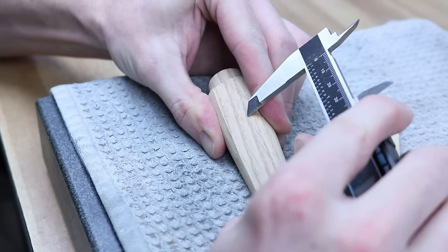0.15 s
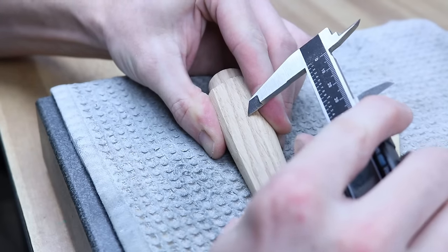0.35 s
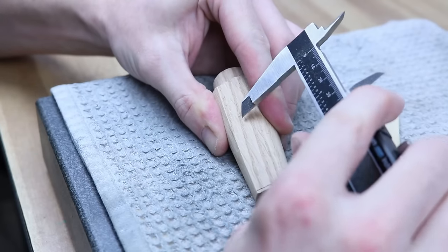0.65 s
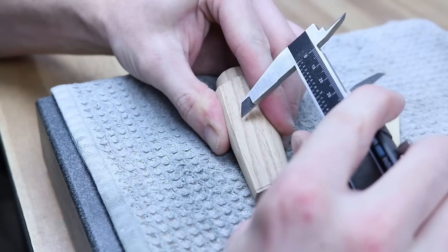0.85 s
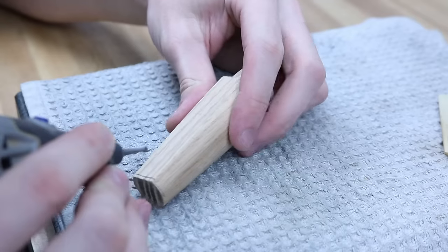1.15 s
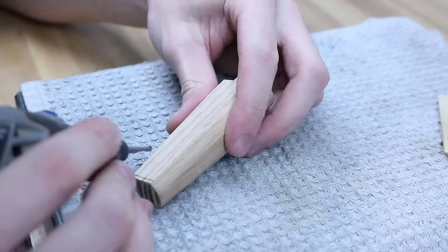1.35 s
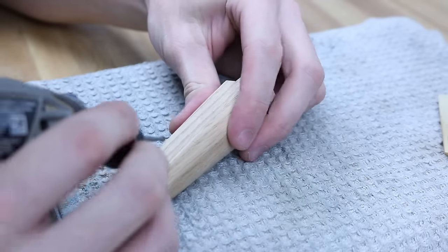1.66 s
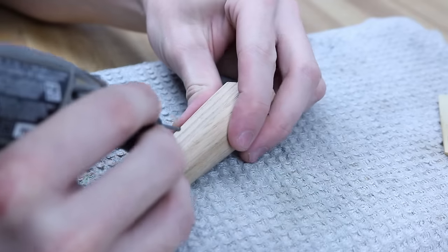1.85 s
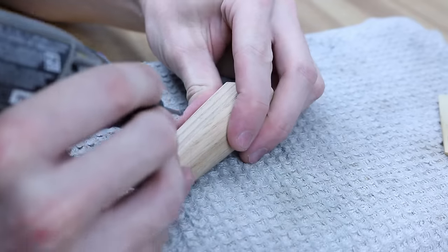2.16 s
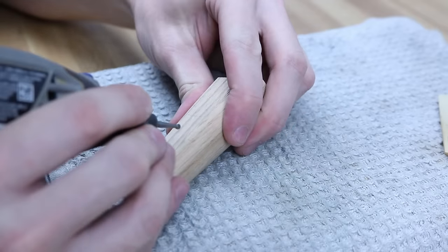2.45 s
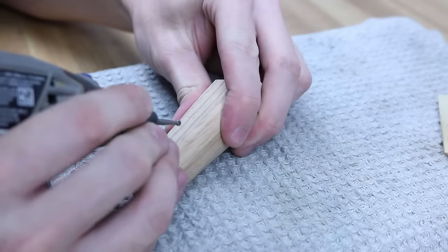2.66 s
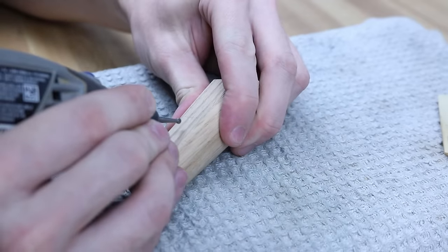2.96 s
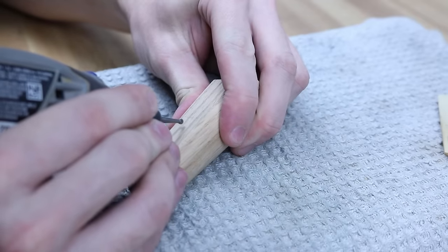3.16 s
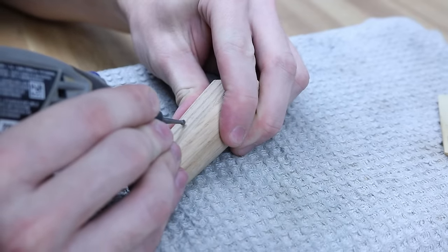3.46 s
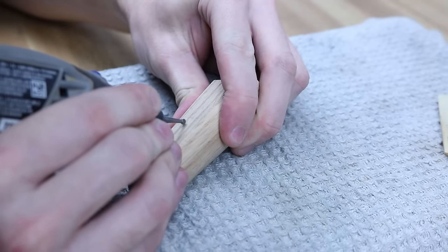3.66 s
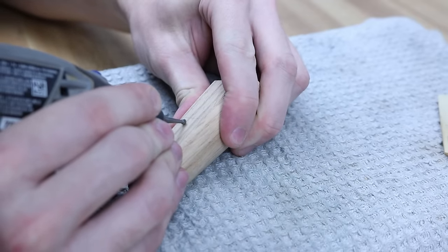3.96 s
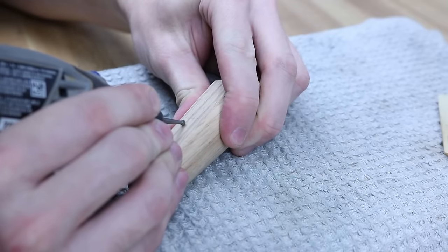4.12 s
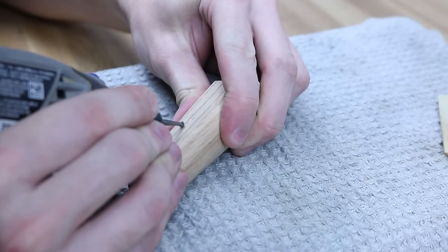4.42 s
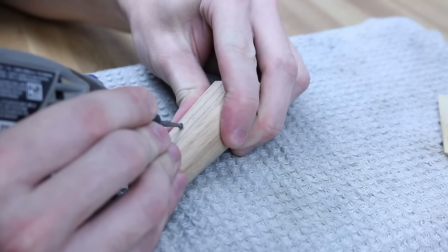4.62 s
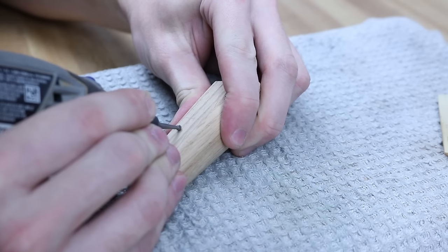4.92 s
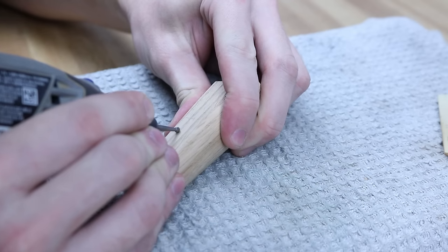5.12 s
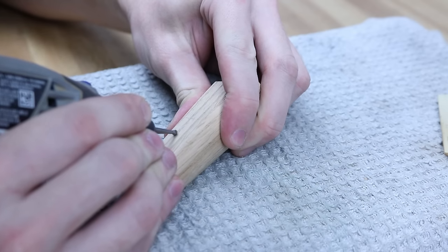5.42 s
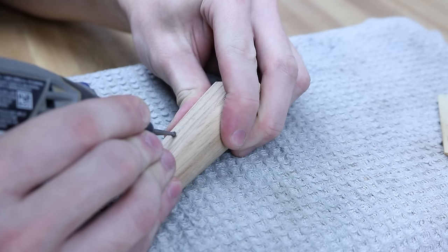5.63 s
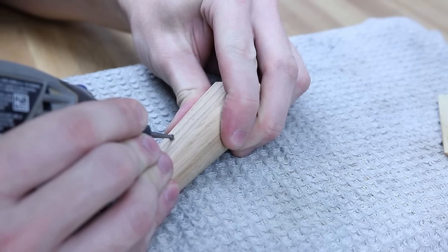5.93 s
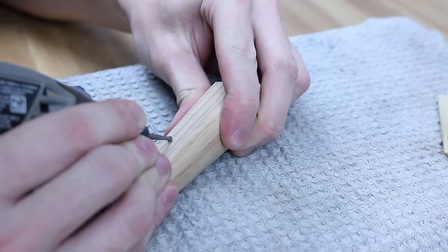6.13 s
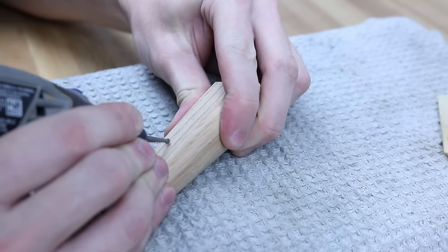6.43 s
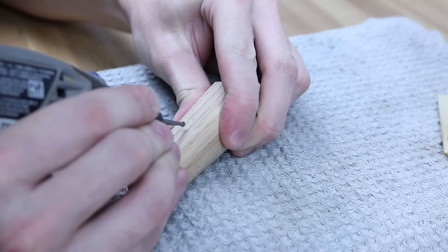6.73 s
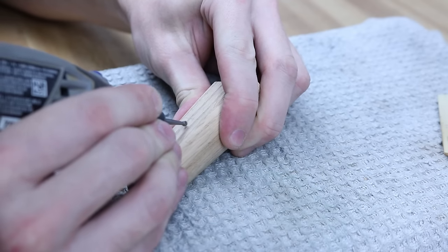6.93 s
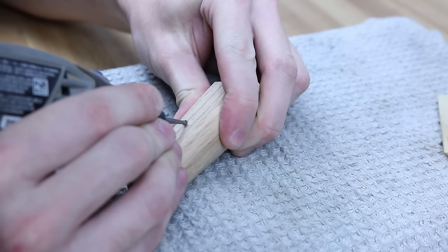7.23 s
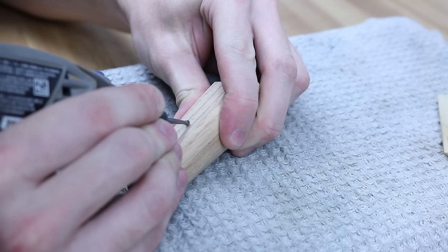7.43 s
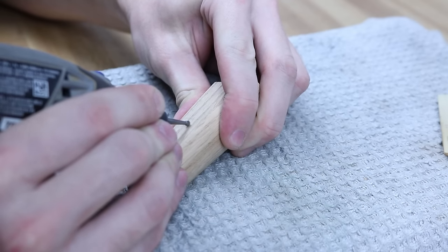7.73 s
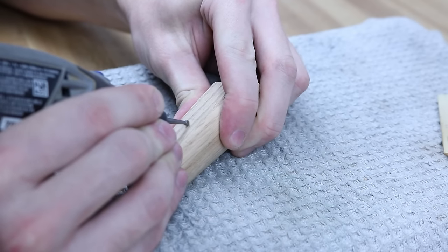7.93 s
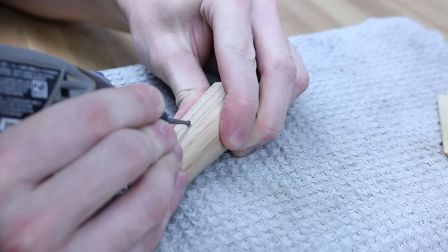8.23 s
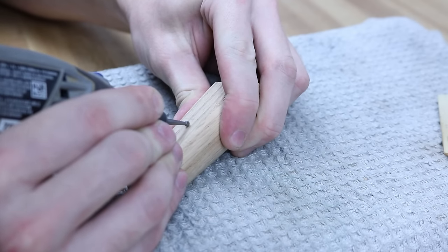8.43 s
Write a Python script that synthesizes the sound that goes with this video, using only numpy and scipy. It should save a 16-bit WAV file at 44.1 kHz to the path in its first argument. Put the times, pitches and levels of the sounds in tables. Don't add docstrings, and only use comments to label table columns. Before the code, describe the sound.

From 0 to 1.1 s a quiet workshop: soft low room hush, a faint wavering mid-low drone from a distant appliance, a small tick of calipers on wood right at the start and a fainter one just before the change. At 1.1 s it cuts abruptly to a small rotary tool already running very close: a piercing, many-toned electric whine over bright rushing air, its timbre shifting as hands move around it, with soft low air buffets mainly at right. Around 3.8 s the bit touches wood; from 4.2 s a rough buzzing grind grows and the pitch slowly sags, lowest near 6.4 s. The bit lifts at 6.5 s, the grinding drops away and the whine climbs back. From 7.1 s a second pass grinds in short uneven pushes, strong until the sound stops mid-cut at 8.6 s. Dry, close stereo.

```python
import sys
import numpy as np
from scipy import signal
from scipy.fft import rfft, irfft
from scipy.io import wavfile
from scipy.ndimage import uniform_filter1d

SR = 44100
rng = np.random.default_rng(int(sys.argv[2]) if len(sys.argv) > 2 else 0)


def volts(x):
    e = np.asarray(x, float) / 20
    return 10 ** e


def digitize_waveform(pressure):
    field = np.atleast_2d(pressure).T
    bounded = np.clip(field, -1, 1)
    quanta = np.round(bounded * 32767).astype(np.int16)
    wavfile.write(sys.argv[1], SR, quanta)


N = 378378
T = np.arange(N) / SR
HOP = 256
START_S = 1.0902
MAINS_HZ, HUM_DB = 119.8, -74.5

# time_s, shaft_hz
SPEED = [(1.1, 245.57), (1.45, 245.56), (1.93, 245.92), (2.5, 246.56), (3.15, 246.39), (3.75, 246.47),
         (4.14, 246.06), (4.65, 244.73), (5.33, 241.4), (6.01, 235.79), (6.38, 233.95), (6.46, 234.2),
         (6.7, 238.5), (6.9, 240.75), (7.15, 242.85), (7.47, 243.84), (8.32, 243.47), (8.58, 242.2)]
FREE_HZ = 246.6


def motor():
    shaft_hz, = columns(SPEED)
    return shaft_hz, np.maximum(FREE_HZ - shaft_hz, 0)


# shaft_multiple, left_db, right_db
BARS = [(7, -90, -90), (8, -64, -58), (9, -63, -66), (15, -62, -64), (16, -42, -45), (17, -55, -62),
        (23, -63, -65), (24, -52, -56), (25, -52, -56), (31, -63, -64), (32, -43, -53), (33, -53, -57),
        (39, -59, -63), (40, -52, -64), (41, -53, -60), (47, -62, -71), (48, -53, -68), (49, -58, -68),
        (55, -63, -67), (56, -53, -61), (57, -58, -72)]
# shaft_multiple, left_db, right_db
SHAFT = [(18, -44, -47), (19, -65, -72), (21, -60, -68), (26, -64, -66), (27, -55, -55), (29, -58, -60),
         (30, -63, -73), (34, -63, -68), (35, -56, -62), (36, -53, -66), (37, -56, -69), (38, -60, -67),
         (42, -55, -72), (43, -65, -70), (45, -62, -70), (53, -65, -73), (54, -64, -67), (59, -63, -74)]
# shaft_multiple, left_db, right_db
BEARING = [(16.3, -58, -62), (15.3, -66, -68), (1, -82, -77)]
# shaft_multiple, level_db
SPARK = [(19, -68), (50, -70), (68, -74)]
# time_s, second_bar_tone_db, fourth_bar_tone_db, blade_tone_db
SHADE = [(1.1, -46, -48, -46.5), (1.3, -44, -48, -47.5), (1.62, -42.5, -40, -47.5),
         (2.0, -55.5, -47.5, -44.7), (2.27, -54, -50, -46), (2.5, -44.5, -40.5, -48),
         (2.95, -41, -43, -43.5), (3.3, -39, -44, -44), (4.14, -39.5, -46.5, -42.5),
         (4.31, -47, -45.5, -43), (4.82, -46, -47.5, -42.5), (5.0, -37.5, -44.5, -43.5),
         (5.4, -48.5, -54, -43.5), (6.01, -48.5, -54, -44), (6.38, -54, -55, -54), (6.62, -45.5, -48, -43),
         (7.1, -42.5, -44.5, -44.5), (8.58, -48.5, -44.5, -43.5)]
# time_s, left_lead_rad
TURN = [(1.9, .1), (2.3, 2.1), (5, 1.9), (6.5, 1.1)]
# frequency_hz, left_lead_rad
LEAD = [(300, 0), (2000, 1.1), (3200, 2), (4400, 1.3), (5900, 3.1), (7900, 4.2), (10000, 5.5), (13800, 5.6)]
# frequency_hz, gain_db
GRIPPED = [(2000, 1), (6000, -8.5), (7300, 2.5), (8100, -7), (9100, 5), (10100, -13.5), (11000, -0.5),
           (13700, -5)]
GRIP_S, SPARK_LOAD_DB = 4.25, 5
SAG_DB_PER_HZ = -0.05
SPEED_UP_DB = 0.1347


def tones(turns, shaft_hz, sag_hz, waver=0.36, steady=0.11):
    second_db, fourth_db, blade_db = columns(SHADE)
    own = {16: second_db, 32: fourth_db, 18: blade_db}
    recovery = uniform_filter1d(np.gradient(shaft_hz) * SR, size=4000)
    other_db = SAG_DB_PER_HZ * sag_hz + SPEED_UP_DB * np.maximum(recovery, 0)
    other_db = other_db - np.mean(other_db[SR:4 * SR])
    mean_hz = np.mean(np.diff(turns)) * SR
    surge = np.cos(2 * np.pi * MAINS_HZ * T)
    rows = BARS + SHAFT + BEARING
    free = sorted(set(range(19, 69)) - {round(row[0], 1) for row in rows})
    spark_db = np.interp(free, *np.transpose(SPARK))
    sparks = [(k, db, db - 11.0) for k, db in zip(free, spark_db)]
    skirt = signal.butter(1, 330, fs=SR, output="sos")
    grip = np.clip((T - GRIP_S) / 0.28 + 0.5, 0, 1)
    turned = np.interp(np.arange(N // HOP + 2) * HOP / SR, *np.transpose(TURN))
    out = np.zeros((2, N))
    for k, left_db, right_db in rows + sparks:
        k = round(k, 1)
        if k in own:
            level_db = own[k]
        else:
            grip_db = SPARK_LOAD_DB if k in free else read(GRIPPED, k * mean_hz)
            level_db = left_db + other_db + grip * grip_db
        level = volts(level_db) * np.sqrt(2)
        if k % 8 == 0:
            level = level * (1 + (0.9 if k == 8 else 0.16) * surge)
        if k == 8:
            level = level * volts(1.7 * (np.gradient(turns) * SR - 246.0))
        re, im, re_right, im_right = (steady if k in own else waver) * slow(1.35, count=4)
        spin = np.exp(2j * np.pi * (k * turns + rng.random()))
        if k in own:
            fuzz = evened(signal.sosfilt(skirt, rng.standard_normal((N, 2)) @ [1, 1j]))
            spin = spin * (1 + 0.21 * fuzz)
        lead = turned if k == 16 else read(LEAD, k * mean_hz)
        late = np.exp(-1j * lead) * volts(right_db - left_db)
        out[0] += level * (spin * full(1 + re + 1j * im)).real
        out[1] += level * (spin * full(late * (1 + re_right + 1j * im_right))).real
    return out


# frequency_hz, width_hz, level_db
BLOCK = [(243.5, 34, -20.5), (967, 53, -2.5), (1170, 59, -5), (1656, 190, -3)]
# frequency_hz, width_hz, level_db
BIT = [(2130, 190, -10), (2876, 470, -6), (3128, 150, -10.5), (4520, 350, -8), (5520, 1400, -1),
       (6530, 140, -11.5), (7900, 2000, -5.5)]
# frequency_hz, width_hz, level_db
GRIP = [(504.5, 300, -0.5)]
# time_s, level_db, left_minus_right_db
THUD = [
    (3.8, -70, 4),
    (4.25, -60, 7),
    (4.93, -59, 9),
    (5.59, -67.5, 18),
    (6.27, -66.5, -27),
    (6.69, -69.5, 9.5),
    (8.45, -54.5, 13),
    (8.58, -59, 9),
]


def cutting(turns, sag_hz, uneven=0.031, chips=0.44):
    block_db, bit_db, block_hz, bit_hz = effort(sag_hz)
    thud_db, thud_pan = columns(THUD)
    phase = 2 * np.pi * turns
    knock = evened(sum(np.cos(k * phase) for k in range(1, 45)))
    each_turn = rng.standard_normal(int(turns[-1]) + 2)
    knock = knock * (1 + uneven * each_turn[(turns + 0.5).astype(int)])
    knock = knock * volts(1.28 * full(slow(6.8)[0]))
    tear = evened(np.exp(-(turns % 1) / 0.28) * rng.standard_normal(N))
    low = volts(block_db - 1.83) * rung(knock + 0.032 * tear, BLOCK, block_hz, 620.0)
    high = volts(bit_db + 4.5) * rung(knock + chips * tear, BIT, bit_hz, 370.0)
    rocking = rung(knock, GRIP, np.full(N, 725.0), 220.0)
    thud = volts(thud_db - 1.5) * (T > THUD[0][0]) * rocking
    right = np.roll(low, 3) + volts(1.8) * np.roll(high, 3)
    return np.array([low + high, right]) + thud * volts([thud_pan / 2, -thud_pan / 2])


# time_s, knock_through_block_db, knock_through_bit_db
CUT = [(3.8, -83, -62), (4.1, -68, -56), (4.3, -58, -49), (4.9, -53, -46.5), (5.2, -48.5, -50),
       (5.9, -49.5, -51.5), (6.15, -46.5, -54), (6.42, -45, -56.5), (6.5, -69, -65), (7.03, -70, -67),
       (7.12, -57, -51.5), (7.48, -53, -50.5), (7.75, -50, -51.5), (8.1, -51, -52), (8.3, -49, -47.5),
       (8.47, -46, -50.5), (8.58, -49, -52)]
# time_s, extra_db, width_s
PUSHES = [(4.3, 2, 0.042), (4.52, 1, 0.062), (4.82, 1, .05), (4.99, -1, 0.061), (5.4, 2.5, 0.062),
          (5.8, 2.5, .05), (6.0, 3, .05), (7.34, -1, 0.024), (7.6, 8.5, 0.053), (7.68, -6, .02),
          (7.87, 5.5, 0.038), (8.14, 6, 0.036), (8.19, -9, 0.0079), (8.25, 5, 0.027), (8.42, 5, 0.045)]
BLOCK_RING_HZ, BLOCK_RISE = 980, 36
BIT_RING_HZ, BIT_FALL = 3954, 263
RING_WANDER = 0.015


def effort(sag_hz):
    push = sum(db * np.exp(-0.5 * ((T - s) / width) ** 2) for s, db, width in PUSHES)
    block_db, bit_db = columns(CUT)
    block, bit = (1 + RING_WANDER * full(drift) for drift in slow(4.0, count=2))
    block_hz = BLOCK_RING_HZ + BLOCK_RISE * sag_hz
    bit_hz = BIT_RING_HZ - BIT_FALL * np.sqrt(sag_hz)
    return block_db + push, bit_db + 0.76 * push, block * block_hz, bit * bit_hz


def rung(drive, modes, moving_hz, width_hz):
    turn = np.exp(2j * np.pi * np.cumsum(moving_hz) / SR)
    r = np.exp(-np.pi * width_hz / SR)
    twice = np.convolve([1, -r], [1, -r])
    out = evened((turn * signal.lfilter([1], twice, drive / turn)).real)
    for hz, wide, db in modes:
        b, a = signal.iirpeak(hz, hz / wide, SR)
        out = out + volts(db) * evened(signal.lfilter(b, a, signal.lfilter(b, a, drive)))
    return evened(out)


# frequency_hz, density_db_per_hz
AIR = [(150, -20), (400, -17), (500, -6.5), (700, -9.5), (1250, 2), (1900, -4), (3000, 2), (4450, -5.5),
       (4950, -9.5), (5700, 0), (7800, -3), (9000, -3), (10500, -5.5), (16000, -16.5)]
# frequency_hz, likeness
AIR_SAME = [(300, 0.91), (1300, 0.75), (2000, 0.99), (4000, 0.7), (12000, 0.033)]
# frequency_hz, left_minus_right_db
LEAN = [(200, 1), (2400, -1), (4400, 2), (8000, 8.5), (15000, 1)]


def air(turns, beat=0.023, level_db=-43.5):
    pulse = 1 + beat * np.cos(2 * np.pi * turns) + 0.082 * np.cos(4 * np.pi * turns)
    return volts(level_db) * pulse * noise(AIR, AIR_SAME, LEAD, LEAN)


def draught(spread=0.39, length_s=0.015):
    sos = signal.butter(2, [35, 130], "bandpass", fs=SR, output="sos")
    out = volts([[-84.0], [-74.0]]) * evened(signal.sosfilt(sos, rng.standard_normal((2, N))))
    t, f = np.arange(-2048, 2048) / SR, np.fft.rfftfreq(4096, 1 / SR)
    shape = np.exp(-0.5 * (t / length_s) ** 2)
    for s, db, hz in buffets():
        octave_width = np.where(f < hz, 1.1, spread)
        hump = np.exp(-0.5 * (np.log((f + 1) / hz) / octave_width) ** 2)
        hump = hump * np.clip(f / 50, 0, 1) ** 3
        eddies = irfft(rfft(rng.standard_normal(4096)) * hump)
        eddies = eddies / np.sqrt(np.sum((eddies * shape) ** 2) / np.sum(shape ** 2))
        gains = volts([[db - 19.0 + BUFFET_PAN_DB], [db - 6.0]])
        part = out[:, round(s * SR) - 2048:][:, :4096]
        part += (gains * shape * eddies)[:, :part.shape[1]]
    return out


# time_s, right_db, centre_hz
BUFFETS = [(1.316, -46, 101), (1.526, -46, 107), (1.732, -45.5, 144), (1.88, -48, 101), (1.959, -45, 101),
           (2.037, -38, 135), (2.566, -43, 110), (2.686, -49.5, 78), (3.06, -42, 191), (3.512, -49, 116),
           (3.564, -39.5, 135), (3.823, -46, 138), (3.897, -48.5, 94), (4.251, -49, 120), (4.286, -45, 104),
           (4.52, -46, 120), (4.583, -41, 156), (5.04, -47, 92), (5.282, -45, 114), (5.489, -39, 127),
           (5.852, -44.5, 119), (5.956, -41.5, 141), (6.013, -46, 102), (6.604, -47, 100),
           (6.984, -42, 125), (7.565, -46.5, 120), (7.905, -41.5, 104), (7.95, -47, 98),
           (8.336, -36.5, 144), (8.429, -45, 148)]
BUFFET_PAN_DB, FLUTTER_DB, FLUTTER_HZ = -28, -54, 110


def buffets(count=36):
    when, size, pitch = rng.random((count, 3)).T
    s = START_S + 0.1 + (np.arange(count) + when) / count * (N / SR - START_S - 0.2)
    level_db = FLUTTER_DB + 8 * (size - 0.5)
    return BUFFETS + list(zip(s, level_db, FLUTTER_HZ * (1 + 0.5 * (pitch - 0.5))))


# frequency_hz, density_db_per_hz
ROOM = [(15, -47), (25, -29), (66, -3.5), (137, -16.5), (223, -9.5), (344, -14.5), (394, -12), (516, -18.5),
        (659, -16.5), (714, -21.5), (4870, -30), (12200, -34), (16000, -63)]
ROOM_DB = -59
# frequency_hz, likeness
ROOM_SAME = [(60, 0.79), (180, 0.78), (550, 0.5), (1650, 0.088), (4970, 0.037), (15000, 0.05)]
# time_s, pitch_hz, level_db
DRONE = [
    (0.0, 388, -63),
    (0.048, 385.5, -65.5),
    (1.054, 411.6, -70),
    (1.08, 418.9, -87),
]
# start_s, scrape_db, knock_db
TICKS = [
    (0.055, -60, -55),
    (1.056, -71, -62),
]


def workshop(knock_hz=420, tick_s=0.01):
    hz, db = columns(DRONE)
    hush = volts(ROOM_DB) * noise(ROOM, ROOM_SAME)
    wavering = volts(db + 4.3 * full(slow(10.5)[0]))
    out = hush + np.sqrt(2) * wavering * np.sin(2 * np.pi * np.cumsum(hz) / SR)
    t = np.arange(1300) / SR
    shape = t / tick_s * np.exp(1 - 2 * t / tick_s) * 2
    for s, scrape_db, knock_db in TICKS:
        scrape = evened(signal.lfilter([1], [1, -0.6], rng.standard_normal(len(t))))
        tick = volts(scrape_db) * scrape + volts(knock_db) * np.sin(2 * np.pi * knock_hz * t)
        out[:, round(s * SR):][:, :len(t)] += tick * shape
    return out


def noise(spectrum, same, lead=((1, 0), (2, 0)), lean=((1, 0), (2, 0)), patchy_db=0.5):
    hz = np.fft.rfftfreq(1024, 1 / SR)[:, None]
    a, b, c, d, patches = rng.standard_normal((N // 256 + 5, 513, 5)).T
    patches = uniform_filter1d(patches, size=10, axis=0)
    patches = evened(uniform_filter1d(patches, size=14, axis=1))
    like = np.clip(read(same, hz), 0, 1)
    tilt = volts(read(lean, hz) / 2)
    left = a + 1j * b
    right = like * left * np.exp(-1j * read(lead, hz)) + np.sqrt(1 - like ** 2) * (c + 1j * d)
    z = np.array([left * tilt, right / tilt]) * volts(read(spectrum, hz) + patchy_db * patches)
    return evened(signal.istft(z, nperseg=1024, noverlap=768)[1][:, :N])


def evened(x):
    return x / np.sqrt(np.mean(abs(x) ** 2) + 1e-20)


def read(points, hz):
    f, value = np.transpose(points)
    return np.interp(np.log(hz + 1), np.log(f + 1), value)


def columns(rows):
    s, *rest = np.transpose(rows)
    return [np.interp(T, s, c) for c in rest]


def slow(hz, count=1):
    sos = signal.butter(2, hz, fs=SR / HOP, output="sos")
    drift = signal.sosfilt(sos, rng.standard_normal((count, N // HOP + 202)))
    return evened(drift[:, 200:])


def full(frames):
    return np.interp(np.arange(N) / HOP, np.arange(len(frames)), frames)


def scene():
    shaft_hz, sag_hz = motor()
    turns = np.cumsum(shaft_hz + 0.063 * full(slow(20.0)[0])) / SR
    hum = np.sqrt(2) * volts(HUM_DB) * np.sin(2 * np.pi * MAINS_HZ * T)
    hush = volts(-73.0) * noise([(20, -6), (300, -14), (800, -3), (16000, -62)], ROOM_SAME)
    tool = tones(turns, shaft_hz, sag_hz) + cutting(turns, sag_hz)
    tool = tool + air(turns) + draught() + hum + hush
    on = np.clip((T - START_S) / 0.0036, 0, 1)
    return (1 - on) * workshop() + on * tool


def roll_off(x):
    return signal.sosfilt(signal.butter(12, 15730, fs=SR, output="sos"), x)


def record(dry):
    edge = signal.firwin(511, 15750, window=("kaiser", 9), fs=SR)
    return roll_off(signal.oaconvolve(dry, edge[None], "same"))


dry = scene()
out = record(dry)
digitize_waveform(out)
```